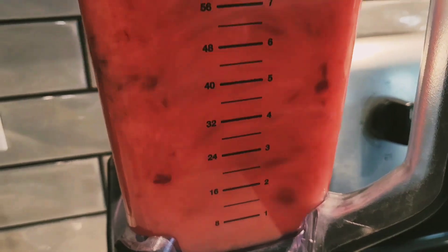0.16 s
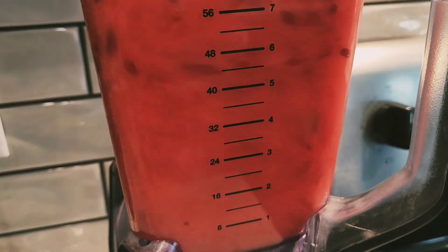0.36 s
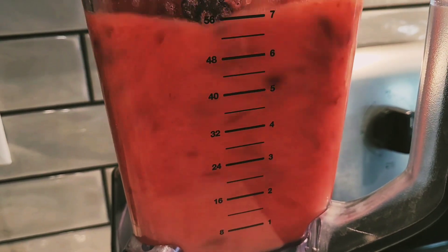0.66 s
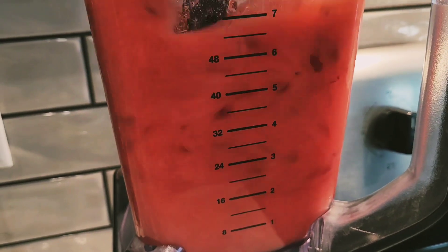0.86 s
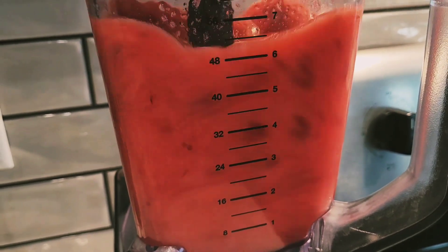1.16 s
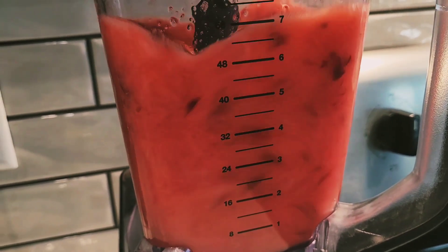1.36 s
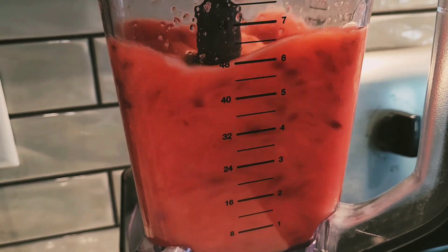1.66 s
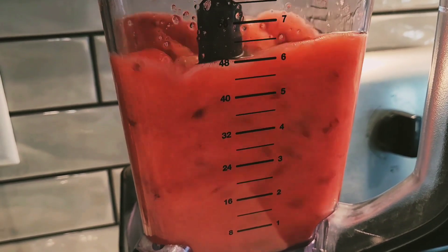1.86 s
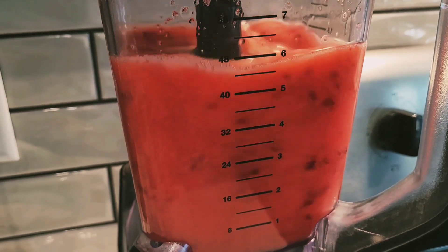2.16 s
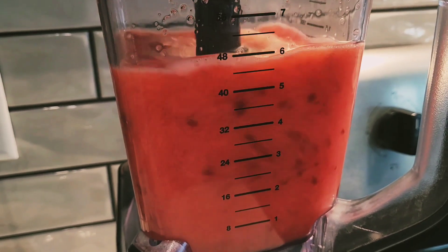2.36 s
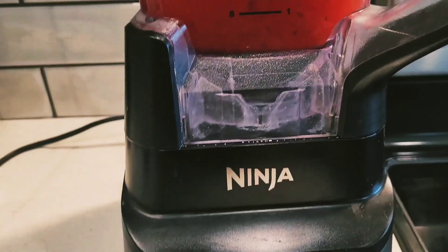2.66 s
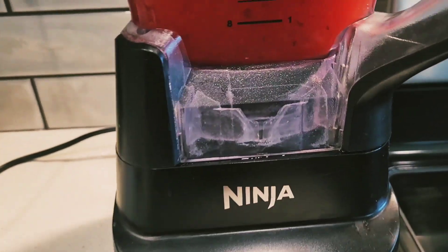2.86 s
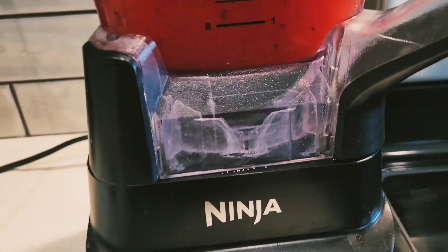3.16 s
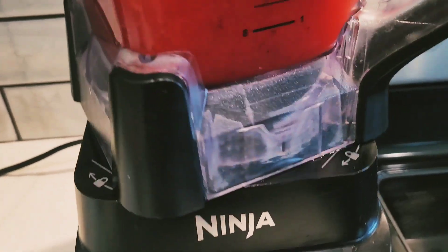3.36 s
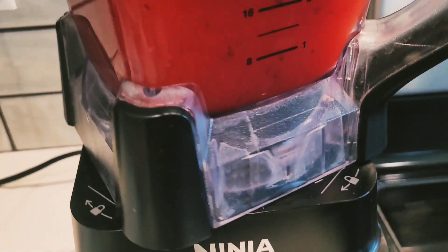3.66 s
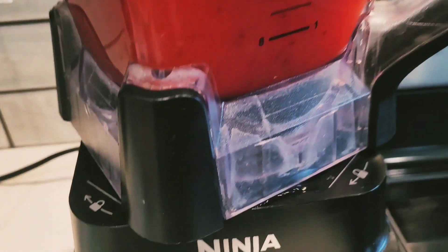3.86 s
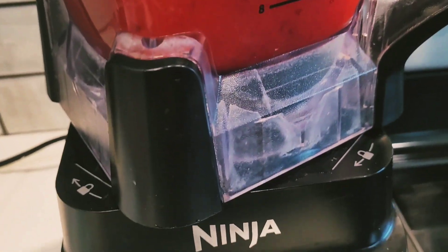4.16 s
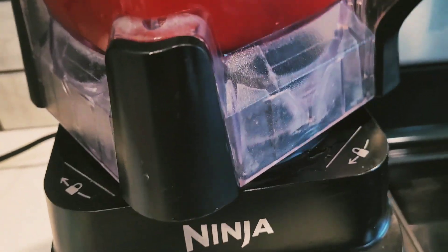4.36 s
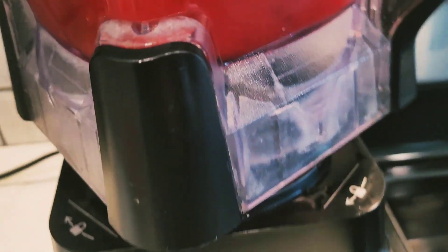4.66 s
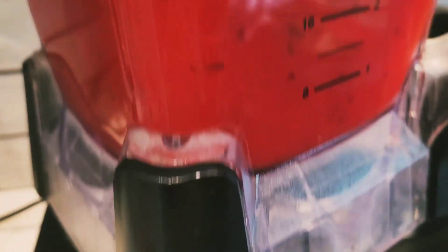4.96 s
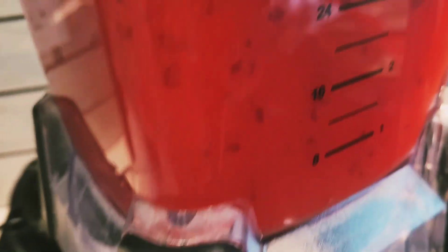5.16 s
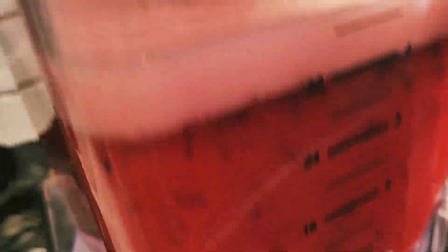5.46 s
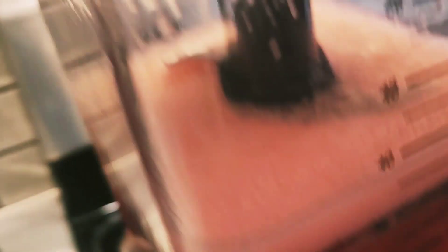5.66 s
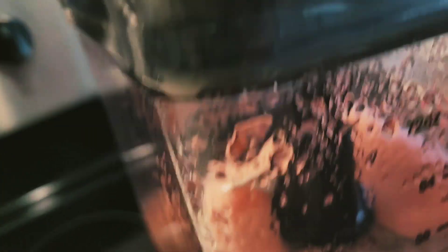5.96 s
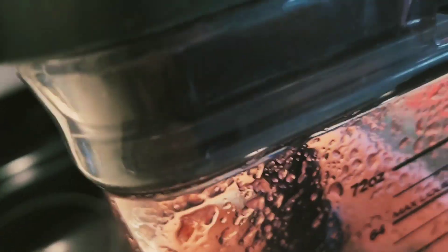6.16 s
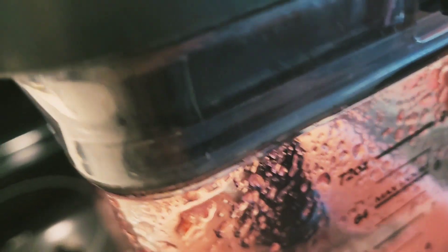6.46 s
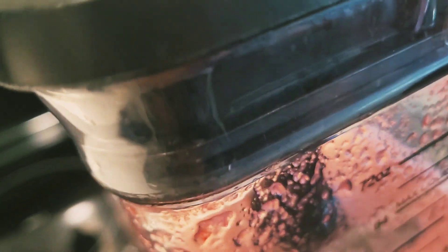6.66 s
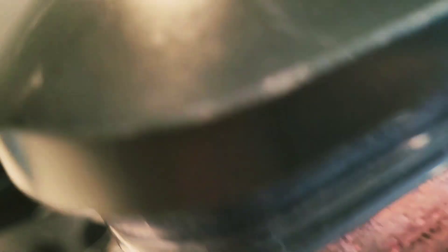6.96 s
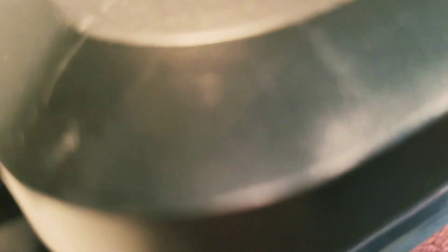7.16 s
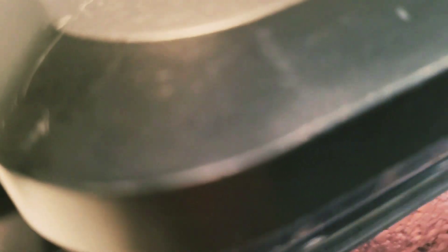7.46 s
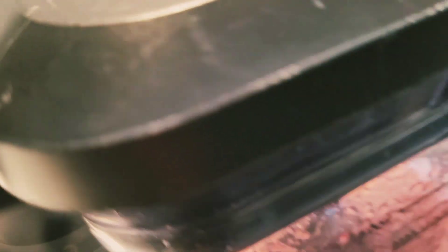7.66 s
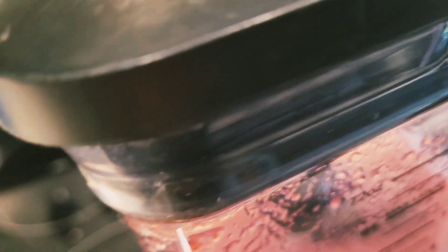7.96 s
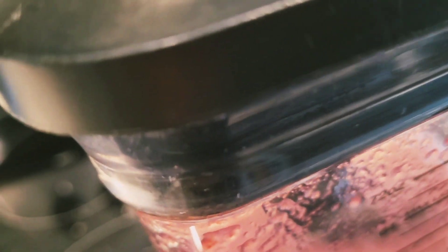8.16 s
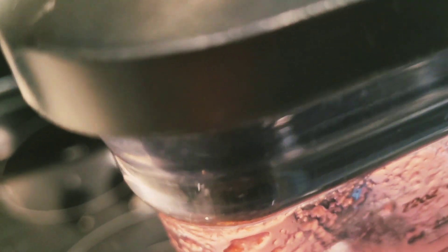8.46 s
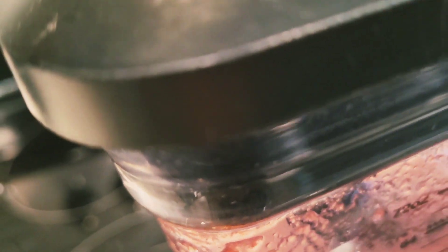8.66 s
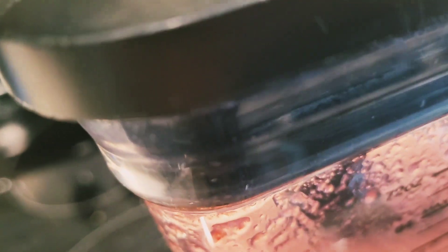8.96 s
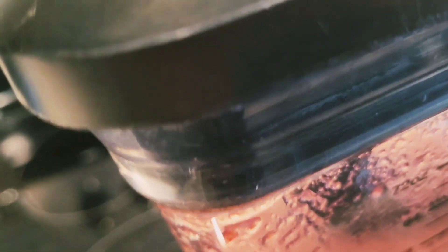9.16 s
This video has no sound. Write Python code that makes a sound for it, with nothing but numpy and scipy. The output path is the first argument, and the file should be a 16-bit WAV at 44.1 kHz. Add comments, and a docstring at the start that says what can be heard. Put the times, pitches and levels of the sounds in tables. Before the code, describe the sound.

A blender full of wet slush whirs down in pitch, pulses briefly and cuts off, then plastic clacks, a loud snap, rattles and a heavy thud.

```python
"""A countertop blender full of fruit slush coasts down under drag and friction, gets one short powered
pulse and breaks off. Impacts ring the plastic jar as it is twisted loose from its base with a loud snap;
it rocks, rattles and scrapes free by stick-slip. It is set down with a thud on the counter, and its lid is
handled, each blow exciting damped modes. Filtered noise and two tones make a soft hum, with a faint
background hiss of varying level. A phone hears it all close up through two ports."""
import sys
import numpy as np
from scipy import signal
from scipy.fft import rfft, irfft
from scipy.io import wavfile
from scipy.ndimage import uniform_filter1d

SR = 44100
rng = np.random.default_rng(int(sys.argv[2]) if len(sys.argv) > 2 else 0)


def wrap_up_sound(samples):
    """Save the sound to the file named by the first command line argument, as 16-bit audio."""
    columns = np.atleast_2d(samples).T
    # keep every value between -1 and 1, then stretch to whole-number steps
    tamed = np.clip(columns, -1, 1)
    steps = np.round(tamed * 32767).astype(np.int16)
    wavfile.write(sys.argv[1], SR, steps)


N = 410567
TIME = np.arange(N) / SR

# spectrum of the kitchen hum: frequency_hz, relative_level_db
KITCHEN = [(15, -42), (25, -14.5), (172, -8.5), (262, -7), (293, -0.5), (334, -6), (427, -7), (533, -13.5),
           (743, -17.5), (1110, -34.5), (5000, -51), (6500, -77), (11000, -120)]
HUM_DB = -54.5  # full level
# spectrum of the faint background hiss: frequency_hz, relative_level_db
HISS = [(1180, -39.5), (2000, -7), (2570, -7), (9210, -4), (11700, -5), (15900, -6.5)]
# rise and fall of the hiss: time_s, relative_level_db
HISS_LEVEL = [(2.5, -77.5), (3.9, -88), (5.4, -79), (5.7, -71.5), (6.1, -75), (7.7, -77), (8, -72),
              (9.31, -65.5)]

# edges of the five bands, thud, thump, body, clack and tick: frequency_hz
BAND_EDGES_HZ = [30, 150, 450, 1400, 5000, 17000]
# the phone's body shades the treble from the right port most: share of the pan in each band
PAN_SHARE = [0.0052, 0.0355, .25, .6, 1]
TOP_HZ = 15900  # upper limit of the phone

# hands shifting on the jar: firmest_s, level_db, swell_by_20_db_s
GRIPS = [(2.7, -49, 0.2835), (3.2, -37, 0.1419), (3.99, -47, 0.0011), (4.23, -38.5, 0.1202),
         (7.198, -42, 0.1256), (7.42, -44, 0.1046), (7.98, -44.5, 0.1334), (8.24, -44, 0.0886),
         (8.35, -32, 0.0694), (9.29, -48.5, 0.5054)]
GRIP_RELEASE = .85  # time of letting go, as a share of the swell time
# plastic sliding on plastic: start_s, end_s, level_db, slips_per_s
SCRAPES = [(3.641, 3.792, -59, 52.09), (4.199, 4.441, -56.5, 46.46), (4.441, 4.52, -55, 60),
           (7.335, 7.465, -52, 70)]

# blows of the latch, the jar against its base, the jar on the counter, and the lid and handle:
# start_s, strength_db, weight_db (extra bass), hardness_db (extra treble), panel_note_hz
SNAPS = [(2.52, -45, 2, -4, 760), (2.912, -70, -6, 2, 2700), (3.001, -42, -6, 3, 930),
         (3.117, -34, -28, -13, 580), (3.161, -32, 9, -5, 630), (3.226, -20, 5, 3, 1370),
         (3.243, -21, 4, -2, 660)]
JAR_KNOCKS = [(2.27, -57, 0.5, 13, 465.5), (2.607, -43.5, -3, 7, 868.3), (2.78, -46, 8, -13, 487.9),
              (3.212, -36, 22, 8.5, 1380), (3.479, -34.5, -19.5, 15.5, 918.1), (3.492, -60, -4.5, 35, 2900),
              (3.628, -37, -2.5, -7, 789.1), (3.735, -39.5, -2, -2, 651.9), (3.761, -37, 5, -2.5, 640.2),
              (3.92, -34, -5, -16.5, 728), (4.119, -29, -16, -10, 708), (4.181, -33, 4.5, -5, 667.9),
              (4.207, -35.5, -1, 2.5, 641.9), (4.369, -54, -8, 26, 3097), (4.63, -32, 9.5, 6, 1519),
              (4.668, -42, 21, -1.5, 854.1), (4.738, -34, 15, -7, 816.4), (4.789, -51, 10, 3, 790),
              (4.938, -39, -3.5, -43, 533), (4.996, -45, 14, 4.5, 480.3)]
SET_DOWN = [(6.616, -23.5, 0.041, 0, 690.1), (6.683, -32, 1, -2.5, 686.1), (6.807, -38, -1.97, -4, 634.8)]
LID_KNOCKS = [(7.164, -44, 26.5, -8.5, 533), (7.201, -46, 8.5, -7, 500), (7.242, -52.5, -3, -8.5, 500),
              (7.383, -44.5, -0.5, 16.5, 540), (7.409, -42.5, 4, -2, 480.8), (7.454, -56.5, 4.5, 19, 500.4),
              (7.902, -35, -9, 5, 745.5), (7.962, -42, -15.5, -12, 690), (8.04, -23, -14.5, 7.5, 517.9),
              (8.148, -45, -10, -9.5, 901), (8.182, -43, 0, 4, 480.7), (8.264, -45.5, 10, 25.5, 620),
              (8.303, -29.5, 3.5, -3, 487), (8.349, -29, 1.5, -6.5, 1106), (8.468, -47, 8, -24.5, 477.9),
              (8.589, -50, 1, -21, 824.1), (9.229, -53, 28.5, 18.5, 474)]
# nominal ringing modes of each struck body: frequency_hz, relative_level_db, t60_s
SNAP_MODES = [(102.38, -1, .25), (240, 3.5, 0.17), (280.33, 2.5, .2), (352.8, 4.5, 0.16), (706, -3, 0.15),
              (931, -7.5, 0.26), (1370, -5.5, 0.079), (1502.7, -5.5, 0.047), (2061, -9, .1),
              (2717.7, -6.5, 0.078)]
JAR_MODES = [(66, -0.5, 0.22), (116, -9, .15), (270, -6, .13), (379.95, -2, 0.2), (630, -5, 0.076),
             (783, -4.5, 0.054), (930, -11, 0.15), (1530, -5.5, 0.045), (2570, -7, .05),
             (2830, -1.5, 0.031)]
COUNTER_MODES = [(74.47, -1, 0.29), (105.99, -3, 0.2668), (149.47, -1.5, 0.3807), (237.66, 9.5, 0.201),
                 (283.67, 0.5, 0.1554), (542.1, -5, 0.1294), (691.5, -5.5, 0.15), (730.63, -2, 0.083),
                 (2921, 0.5, 0.0504), (3514.1, 0.5, 0.0514)]
LID_MODES = [(199.73, 2, 0.21835), (256.75, 5, 0.169), (295.76, 3.5, 0.1221), (383.76, -4, 0.1605),
             (447.72, 1, 0.0722), (826.82, 3.5, 0.04), (1084.2, -14, 0.0307), (1574.7, -11.5, .04),
             (3440.2, -7, 0.03877)]
# spectrum of each shudder: frequency_hz, relative_level_db
SNAP_COLOUR = [(60, -19.5), (106, -8), (160, -17.5), (225, -6), (282, 0), (356, 3.5), (450, -15),
               (680, -10), (800, -18.5), (1450, -14.5), (2800, -17.5), (3500, -25), (15900, -26)]
JAR_COLOUR = [(24, -38), (40, -6), (184, -13.5), (354, 5), (515, -9.5), (713, -3), (1120, -18.5),
              (1510, -18), (5990, -40), (12100, -47), (15900, -60)]
COUNTER_COLOUR = [(18, -45.5), (30, -10), (75, -4.5), (157, -6), (193, -24), (239, -0.5), (373, -14),
                  (425, -16), (682, -21.5), (1150, -35), (1950, -29.5), (2170, -33.5), (3050, -24),
                  (4170, -33), (15900, -53)]
LID_COLOUR = [(41, -44), (70, 4), (255, 3), (482, -4), (709, -12.5), (1120, -10.5), (2710, -29.5),
              (3560, -31), (9020, -39), (11300, -30.5), (15900, -40.5)]
# share of a blow's weight and hardness that reaches each of the five bands
WEIGHT_SHARE, HARDNESS_SHARE = [1, .55, 0.00304, 0, 0.00506], [0, 0.00145, 0, .5, 1]
# after the snap the jar rocks on its seat in even beats, each weaker, lighter and softer
ROCK_START_S, ROCK_PERIOD_S, ROCK_NOTE_HZ = 3.289, .0435, 658.5
ROCK_FIRST_DB, ROCK_STEP_DB = (-33.5, 16.5, 16.5), (-1, -10.5, -2.5)  # strength, weight, hardness

# coasting: the slush brakes the shaft in proportion to its speed, the bearings at a steady rate
START_HZ, DRAG_S, FRICTION_HZ_PER_S = 249.92, 2.03, 42.4  # shaft turns per second
# each layer: level_db at the starting speed, loss_db when the speed falls tenfold
CHURN_LAW, RATTLE_LAW, AIR_LAW, WHINE_LAW = (-33, 24.341), (-36, 20.424), (-37.5, 37.99), (-45, 11.257)
# effect of the slush's load on the coasting layers: time_s, gain_db
LOAD = [(0, 0), (.8, -7), (1.33, -2.5), (2, -1), (2.22, -2), (2.28, -11.5)]
# spectra of slush, gear rattle, air, and blades grinding ice: frequency_hz, relative_level_db
CHURN = [(35, -48.5), (60, -29.5), (107, -10.5), (166, -18), (280, -5), (364, -1), (417, -6), (456, -21),
         (663, -11.5), (777, -15), (900, -16), (1170, -24), (1980, -120)]
RATTLE = [(410, -17), (700, -6.5), (1460, -6), (1740, -10.5), (2170, -5), (2930, -9), (4740, -10.5),
          (5110, -12), (6600, -19), (9000, -25), (11700, -78), (19800, -120)]
AIR = [(2650, -49.5), (4500, -14), (4740, -15), (5270, -12.5), (6800, 0.5), (9380, -17.5), (11500, -13),
       (13400, -19.5), (15200, -18), (15900, -24.5)]
GRIND = [(290, -39), (500, -38.5), (649, 0), (750, -3), (867, -2), (1620, -13), (2490, -13.5), (5610, -21),
         (8300, -17), (9320, -28), (14000, -32.5), (15900, -29.5)]
# resonances of the housing, then of the full jar: frequency_hz, width_hz, relative_level_db
HOUSING = [(646.9, 64.9, 2), (1431.8, 24.11, 10), (2066.9, 70.2, 0.5), (2416.6, 45.2, 5),
           (4931.3, 83.6, 5.5), (6350, 120, -27.5)]
LOADED = [(109.17, 10.41, -5), (147.92, 20.4, -7), (247.34, 8.206, 10), (286.13, 21.84, 3),
          (365.78, 10.175, 9.5)]
# how well the housing radiates the gear tone: frequency_hz, gain_db
RADIATION = [(700, -14), (880, 3.5), (1100, 3.5), (1700, -4.5), (2300, 5.5), (2850, 2), (3400, 4),
             (4000, -3), (7000, 1.5)]
# how the base answers the unbalanced shaft: shaft_hz, level_db
BASE_RESPONSE = [(40, -80.5), (57, -54.5), (74, -68), (108, -55.5), (205, -52), (250, -30.5)]
TEETH = 13  # gear teeth meeting in each shaft turn
# the short pulse: the motor spins up evenly and the blades bite hardest part-way through
PULSE_ON_S, PULSE_OFF_S, PULSE_ATTACK_S, SPIN_UP_HZ_PER_S = 2.295, 2.449, 0.004466, 560
SHAKE_DB, GRIND_DB = -32, -32.5  # shake without the bite
BITE_S, BITE_WIDTH_S, BITE_DB = 2.354, 0.04049, 10.5


def undb(db):
    """Decibels are twenty times the logarithm of an amplitude ratio."""
    return 10 ** (np.asarray(db) / 20)


def unit(x):
    """Normalization: divide by the root mean square."""
    return x / np.sqrt(np.mean(x ** 2) + 1e-30)


def curves(table):
    """Linear interpolation: each column of a table as a value per sample."""
    s, *columns = np.transpose(table)
    return [np.interp(TIME, s, c) for c in columns]


def band(x, lo_hz, hi_hz, order=3):
    """Causal band-pass filtering."""
    sos = signal.butter(order, [lo_hz, min(hi_hz, .48 * SR)], "band", fs=SR, output="sos")
    return signal.sosfilt(sos, x)


def colour(x, points):
    """Minimum-phase filtering to a spectrum of points that falls away beyond its ends."""
    hz, db = np.transpose(points)
    size = 8192
    f = np.fft.rfftfreq(size, 1 / SR) + 1
    end_slopes = np.minimum(1, np.minimum(f / hz[0], hz[-1] / f)) ** 2
    gain = undb(np.interp(np.log(f), np.log(hz), db)) * end_slopes
    # folding the cepstrum forward in time keeps attacks sharp
    cepstrum = irfft(np.log(gain + 1e-6))
    folded = np.r_[cepstrum[0], 2 * cepstrum[1:size // 2]]
    response = irfft(np.exp(rfft(folded, size)))
    return unit(signal.fftconvolve(x, response[None], axes=1)[:, :x.shape[-1]])


def resonate(x, peaks):
    """Resonance: parallel damped resonators select the energy near their frequencies."""
    parts = [undb(db) * signal.lfilter(*signal.iirpeak(hz, hz / width, SR), x) for hz, width, db in peaks]
    return unit(sum(parts))


def walk(rate):
    """Random fluctuation: interpolated noise, rms 1, with rate knots per second."""
    knots = rng.standard_normal(int(N / SR * rate) + 2)
    return unit(np.interp(TIME * rate, np.arange(len(knots)), knots))


def pair(width, size=N):
    """Partial coherence: noise at two ports, alike at width 0 and unrelated at 1."""
    mid, side = rng.standard_normal((2, size))
    return unit(np.array([mid + width * side, mid - width * side]))


def background():
    """Filtered noise: a soft hum with one steady low tone and one wavering tone, and a faint varying hiss."""
    (hiss_db,) = curves(HISS_LEVEL)
    hum = colour(pair(.3), KITCHEN) * undb(HUM_DB + 0.58 * walk(9))
    low_tone = undb(-66.5) * np.sin(2 * np.pi * 60 * TIME)
    wavering_tone = undb(-64.5 + 3 * walk(7.2)) * np.sin(2 * np.pi * 301 * TIME)
    # the upper and lower hiss wander apart
    lower = band(colour(pair(.9), HISS), 1500, 9000) * undb(2.5 * walk(4))
    upper = band(colour(pair(.9), HISS), 10000, 16000) * undb(1.5 * walk(3))
    hiss = (lower + undb(3.5) * upper) * undb(hiss_db + 4.5) * (TIME > 2.47)
    # the sound breaks off briefly, then the hum resumes louder
    hum_gain = np.interp(TIME, [2.449, 2.452, 2.472, 2.485], [.5, .03, .03, 1])
    return (hum + low_tone + wavering_tone) * hum_gain + hiss


def room(x, wet_db, t60s):
    """Reverberation: tiled walls return a diffuse tail, with its own level and decay in each band."""
    t = np.arange(SR) / SR
    tail = 0
    for k, (db, t60, width) in enumerate(zip(wet_db, t60s, [.15, .2, 0.64, 0.81, 0.93])):
        decay = undb(-60 * t / t60) * (1 - np.exp(-t / .012))
        noise = pair(width, SR) * decay / np.linalg.norm(decay)
        tail = tail + undb(db) * band(noise, *BAND_EDGES_HZ[k:k + 2])
    return signal.fftconvolve(x, tail, axes=1)[:, :N]


def grip():
    """Friction: fingers rub the hollow jar in small uneven slips as each grip swells and lets go."""
    pressure = 0
    for s, db, swell_s in GRIPS:
        away = np.maximum(s - TIME, (TIME - s) / GRIP_RELEASE) / swell_s
        pressure = pressure + undb(db - 20 * away)
    slips = pair(.5) * undb(4.5 * walk(45) + 3 * walk(300))
    jar_spectrum = [(150, -9.5), (240, -0.5), (380, 6), (520, -5), (780, -4), (1100, -14), (1700, -20),
                    (4000, -33), (12000, -41)]
    return pressure * colour(slips, jar_spectrum)


def scrapes():
    """Stick-slip: a thin rasp with uneven runs of tiny ticks is coloured by the jar wall's resonances."""
    force, drag = np.zeros(N), np.zeros(N)
    for start, end, db, rate in SCRAPES:
        slips = np.arange(start, end, 1 / rate)
        chance = rng.standard_normal((len(slips), 2))
        slip_s = slips + .25 / rate * chance[:, 0]
        force[(slip_s * SR).astype(int)] += undb(db + 5.121 * chance[:, 1])
        drag += undb(db) * ((TIME > start) & (TIME < end))
    fade = np.exp(-1 / (0.0091 * SR))
    ticks = signal.lfilter([1], [1, -fade], force + 1e-18)
    rub = undb(-2.5) * ticks + undb(-17) * uniform_filter1d(drag, SR // 100)
    wall = [(1470, 478, 2), (3052, 327.3, 4.5), (3764.2, 300.6, -2.5), (5186, 6250, -10.5),
            (11900, 1700, -10)]
    return rub * resonate(pair(0.99), wall)


def rocking(count):
    """Damped rocking: the loosened jar strikes its seat in even, weakening beats."""
    rows = []
    for k in range(count):
        strength_weight_hardness = np.add(ROCK_FIRST_DB, k * np.array(ROCK_STEP_DB))
        rows.append((ROCK_START_S + k * ROCK_PERIOD_S, *strength_weight_hardness, ROCK_NOTE_HZ))
    return rows


def blows(table, modes, spectrum, bands_db, low_t60, high_t60, ring_db, crack_db, spot_db,
          stretch_per_db, pan_db, lag_s):
    """Impact excitation: each blow is a brief crack, a dense short shudder and damped ringing modes."""
    size = SR // 3
    t = np.arange(size) / SR
    out = np.zeros((2, N + size))
    shudder_t60s = np.geomspace(low_t60, high_t60, len(BAND_EDGES_HZ) - 1)
    strongest_db = max(row[1] for row in table)
    for s, strength_db, weight_db, hardness_db, spot_hz in table:
        levels_db = strength_db + np.array(bands_db)
        levels_db = levels_db + weight_db * np.array(WEIGHT_SHARE) + hardness_db * np.array(HARDNESS_SHARE)
        # positive stretch makes lighter blows die away sooner, negative makes them last
        length = np.exp(stretch_per_db * (strength_db - strongest_db))
        detune = 1 + 0.006 * rng.standard_normal(len(modes))
        ring = 0
        for (hz, db, t60), d in zip(modes, detune):
            mode = undb(db - 60 * t / (t60 * length)) * np.sin(2 * np.pi * hz * d * t)
            ring = ring + mode * rng.choice([-1, 1])
        # the panel that is struck adds its own short note
        spot = undb(spot_db - 60 * t / (0.051 * length)) * np.sin(2 * np.pi * spot_hz * t)
        ring = unit(ring + spot)
        for k, (db, t60, width) in enumerate(zip(levels_db, shudder_t60s, [.12, .1, .6, 0.88, 1.0])):
            edges = BAND_EDGES_HZ[k:k + 2]
            contact = undb(-60 * t / (t60 * length)) + undb(crack_db - 60 * t / 0.0038)
            shudder = unit(band(colour(pair(width, size) * contact, spectrum), *edges))
            part = shudder + undb(ring_db) * band(ring, *edges)
            # the opening 1/32 s sets the level
            part /= np.sqrt(np.mean(part[:, :SR // 32].mean(axis=0) ** 2))
            ports = np.array([[pan_db], [-pan_db]]) / 2 * PAN_SHARE[k]
            out[:, int(s * SR):int(s * SR) + size] += part * undb(db + ports)
    # a positive lag brings the sound to the right port a little after the left
    return np.array([out[0, :N], np.interp(TIME - lag_s, TIME, out[1, :N])])


def gear_whine(speed, turn, whine_db):
    """Gear meshing: tooth contacts give harmonics, smeared by backlash and shaped by the housing."""
    # the teeth settle differently several times a turn, so the tone narrows as it slows
    settlings = 2.5 * turn / (2 * np.pi)
    whine = 0
    for k, db in enumerate([-0.5, -2, -6.5, -11], 1):
        mesh_hz = TEETH * k * speed
        # the housing radiates poorly below about 800 Hz
        radiated = undb(np.interp(mesh_hz, *np.transpose(RADIATION))) * undb(2.5 * walk(45))
        settle = rng.standard_normal((2, int(settlings[-1]) + 1, 2)) @ [1, 1j]
        carrier = np.exp(1j * k * TEETH * turn)
        smear = np.array([(np.interp(settlings, np.arange(len(z)), z) * carrier).real for z in settle])
        # the overtones weaken with speed
        level = undb(db + whine_db - 5 * (k > 1) * speed / 130)
        whine = whine + level * radiated * (smear + 0.1326 * smear[::-1])
    return whine


def powered_pulse():
    """Forced vibration: under power the blades bite into the ice and shake the full jar."""
    shake_db = SHAKE_DB + BITE_DB * np.exp(-((TIME - BITE_S) / BITE_WIDTH_S) ** 2)
    ice = pair(0.9136) * undb(0.75 * walk(500))
    shake = undb(shake_db) * band(resonate(pair(0.212), LOADED), 94.4, 444.75)
    return shake + undb(GRIND_DB) * colour(ice, GRIND)


def blender():
    """Rotating machinery: shaft speed governs churning slush, gear rattle and whine, air and imbalance."""
    since_on = np.maximum(TIME - PULSE_ON_S, 0)
    creep_hz = FRICTION_HZ_PER_S * DRAG_S
    speed = (START_HZ + creep_hz) * np.exp(-np.minimum(TIME, PULSE_ON_S) / DRAG_S) - creep_hz
    speed = np.clip(speed + SPIN_UP_HZ_PER_S * since_on, 1, START_HZ)
    slowed = np.log10(START_HZ / speed)
    laws = (CHURN_LAW, RATTLE_LAW, AIR_LAW, WHINE_LAW)
    churn_db, rattle_db, air_db, whine_db = (db - loss * slowed for db, loss in laws)
    (load_db,) = curves(LOAD)
    turn = 2 * np.pi * np.cumsum(speed) / SR  # shaft angle in radians
    blade = turn / 4
    throb = (1 + 0.1086 * np.sin(blade)) * undb(0.7334 * walk(36.065))
    teeth = 1 + 0.414 * np.cos(TEETH * turn) + 0.1111 * np.cos(turn)
    churn = undb(churn_db) * colour(pair(0.2109), CHURN) * throb
    grit = pair(0.9932) * teeth * throb
    rattle = undb(rattle_db) * (undb(-2.5) * colour(grit, RATTLE) + undb(-12) * resonate(grit, HOUSING))
    air = undb(air_db) * colour(pair(0.9734) * teeth, AIR) * undb(1.6305 * walk(58.414))
    whine = gear_whine(speed, turn, whine_db)
    shaft_db = np.interp(speed, *np.transpose(BASE_RESPONSE)) + 0.5 * walk(13.9)
    shaft = undb(shaft_db) * np.sin(turn)
    wobble = undb(-46.5) * np.sin(blade) + undb(-50) * np.sin(2 * blade)
    wobble = wobble * np.minimum(speed / 225, 1) ** 5 * undb(2 * walk(8))
    coast = (churn + rattle + air + whine) * undb(load_db) + shaft + wobble
    # the pulse takes over from the coasting sound, and all breaks off together
    powered = np.minimum(since_on / PULSE_ATTACK_S, 1)
    return (coast * (1 - powered) + powered_pulse() * powered) * (TIME < PULSE_OFF_S)


def scene():
    """Superposition: the background, the blender, and the jar and lid in a tiled kitchen add together."""
    handling = blows(
        SNAPS, SNAP_MODES, SNAP_COLOUR, bands_db=[-21, -2, -3, -1.87, -2.0567],
        low_t60=.13, high_t60=0.12, ring_db=3, crack_db=0,
        spot_db=-8.5, stretch_per_db=0.0033, pan_db=3.5, lag_s=0)
    handling += blows(
        JAR_KNOCKS + rocking(count=4), JAR_MODES, JAR_COLOUR, bands_db=[-22, -7.5, -2, -11, -30],
        low_t60=.18, high_t60=0.06, ring_db=4.5, crack_db=-5,
        spot_db=8.5, stretch_per_db=-0.0033, pan_db=5, lag_s=0.00018)
    handling += blows(
        SET_DOWN, COUNTER_MODES, COUNTER_COLOUR, bands_db=[5, 4.5, 2.5, -9.5, -22],
        low_t60=0.2728, high_t60=0.13917, ring_db=5.0, crack_db=9.0,
        spot_db=2, stretch_per_db=0.0105, pan_db=0.4761, lag_s=0)
    handling += blows(
        LID_KNOCKS, LID_MODES, LID_COLOUR, bands_db=[-23.5, -1.5, -4.5, -15.5, -24.5],
        low_t60=0.15857, high_t60=0.03244, ring_db=4.5, crack_db=7,
        spot_db=-9, stretch_per_db=-0.0162, pan_db=8.5, lag_s=0.00032913)
    # only the handling excites the reverberation
    walls = room(handling, wet_db=[-13, -17, -17.5, -16.0, -14.5], t60s=[.6, 0.99787, 0.94, 0.6, 0.4887])
    return background() + walls + grip() + scrapes() + handling + blender()


def record(dry):
    """Band limiting and saturation: the phone thins the deep bass, clips at full scale and cuts the top."""
    thin = signal.sosfilt(signal.butter(2, 38, "high", fs=SR, output="sos"), dry)
    top_cut = signal.ellip(10, .2, 70, TOP_HZ, fs=SR, output="sos")
    return signal.sosfilt(top_cut, np.clip(thin, -1, 1))


dry = scene()
out = record(dry)
wrap_up_sound(out)
```